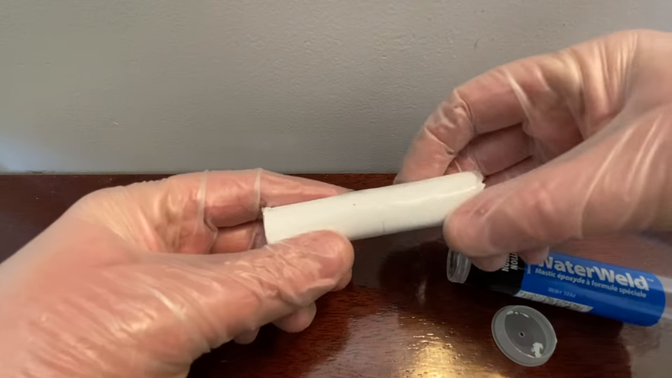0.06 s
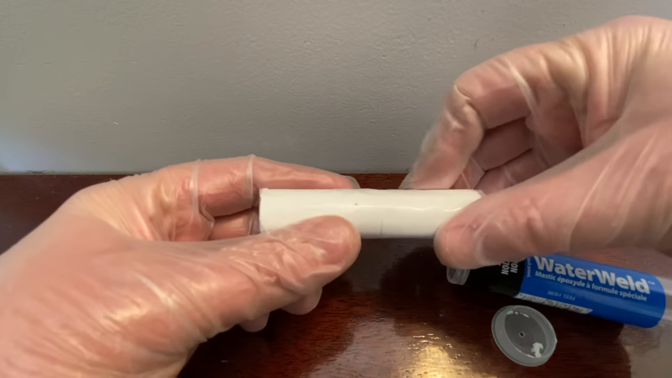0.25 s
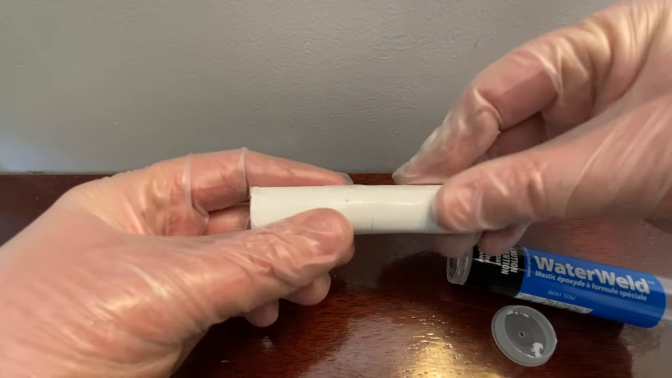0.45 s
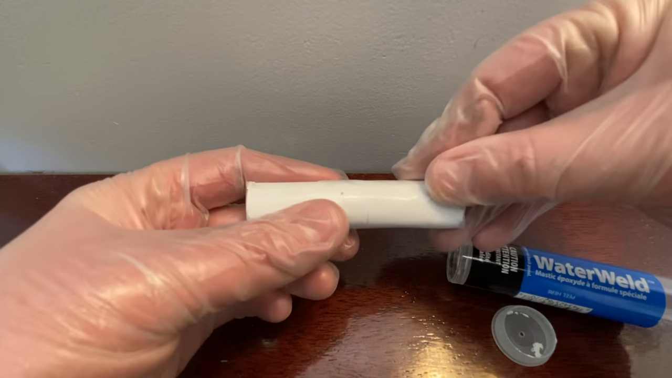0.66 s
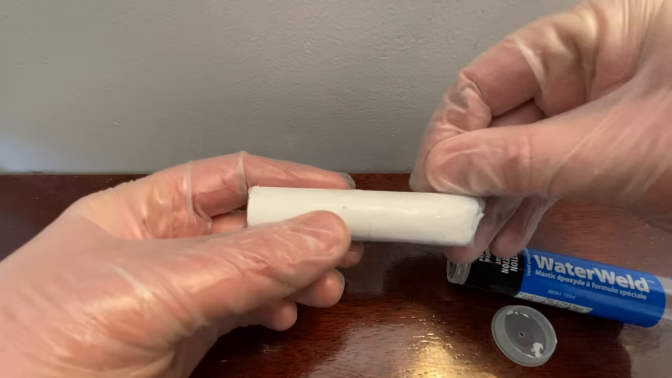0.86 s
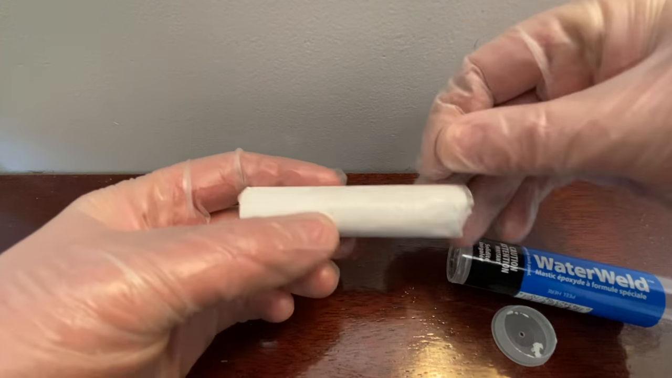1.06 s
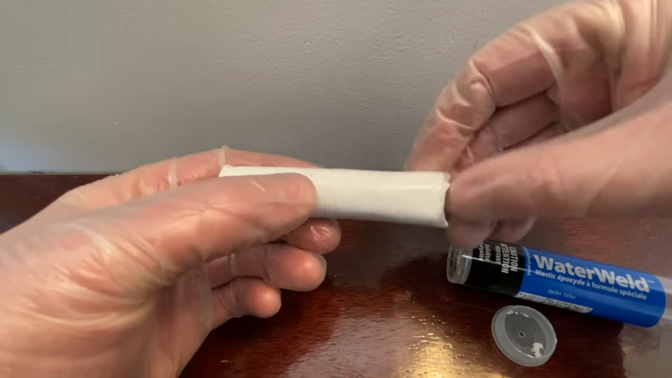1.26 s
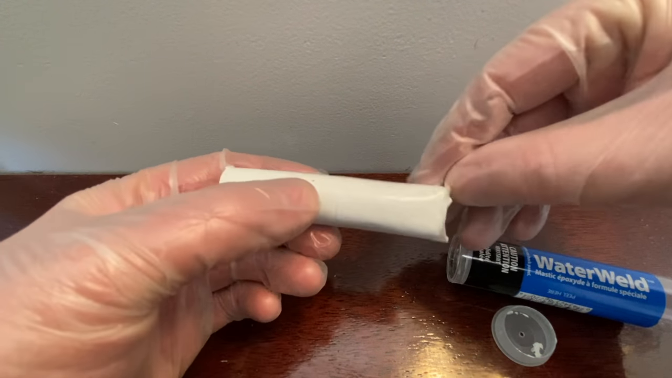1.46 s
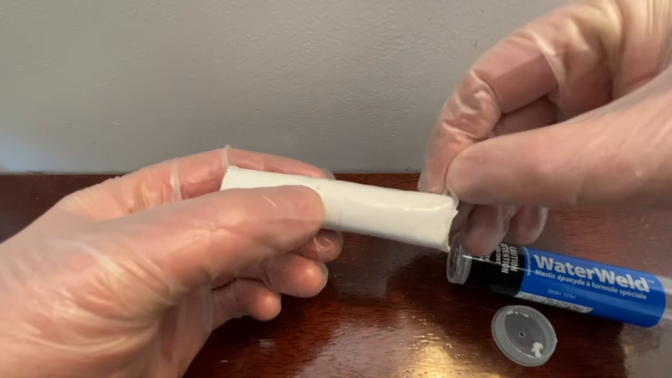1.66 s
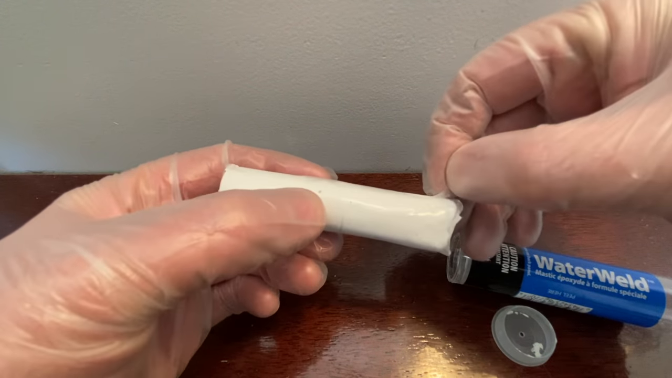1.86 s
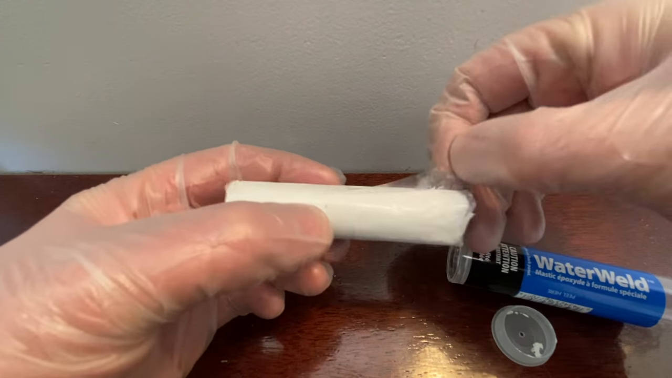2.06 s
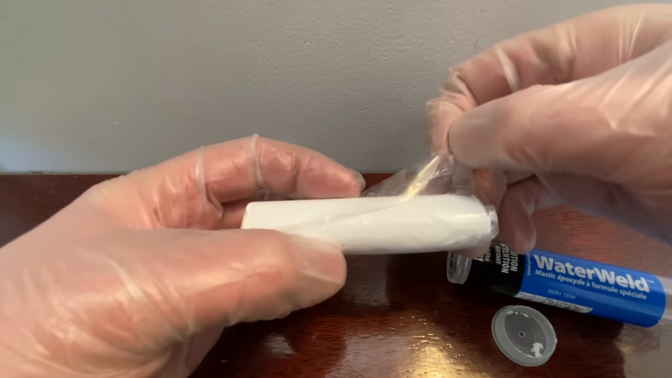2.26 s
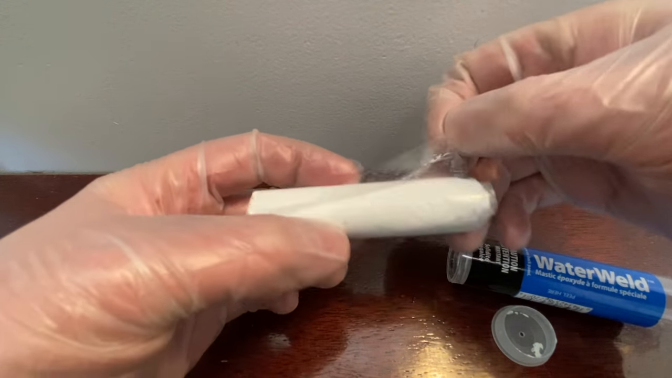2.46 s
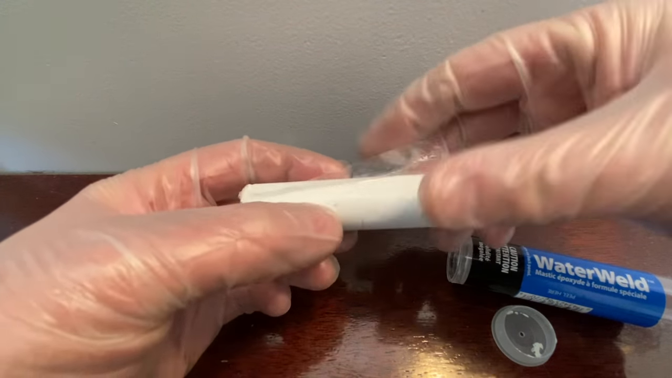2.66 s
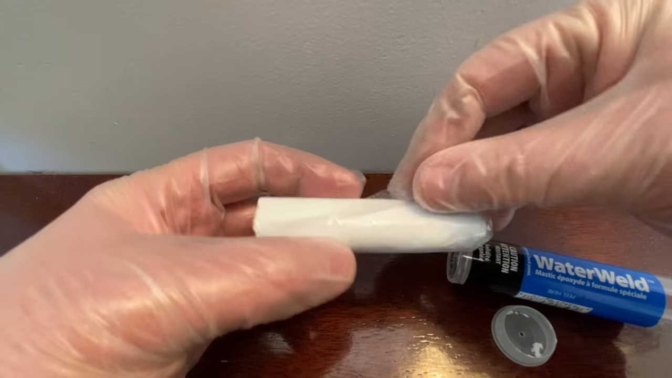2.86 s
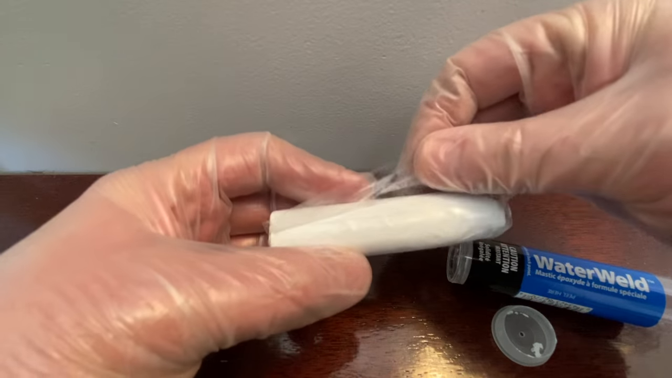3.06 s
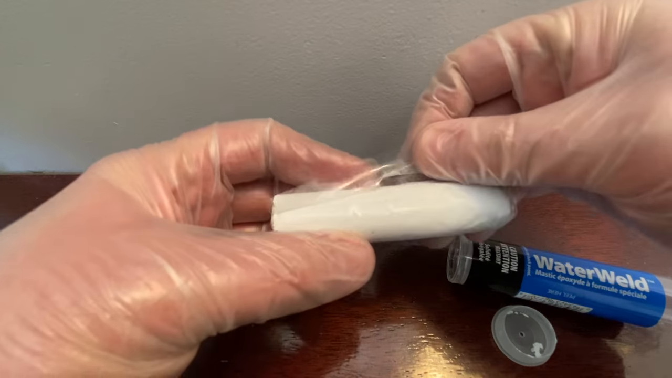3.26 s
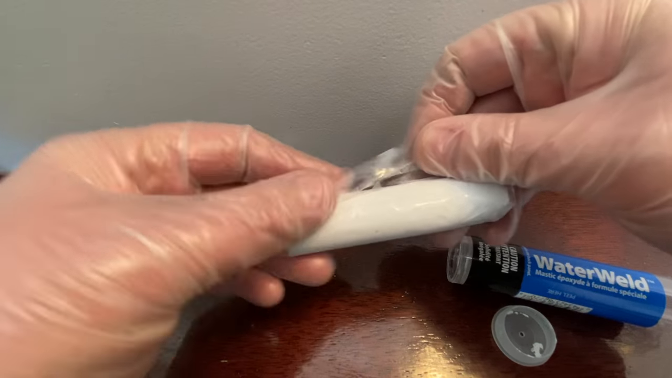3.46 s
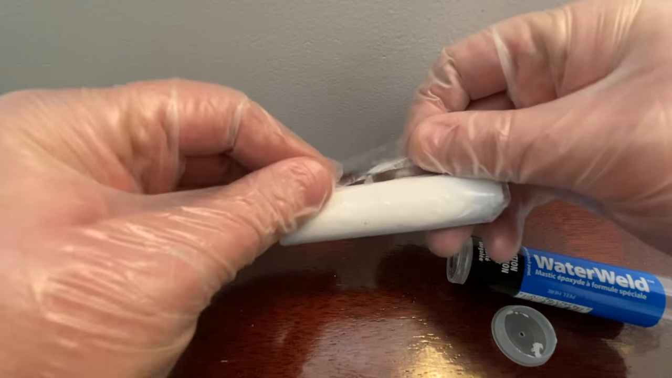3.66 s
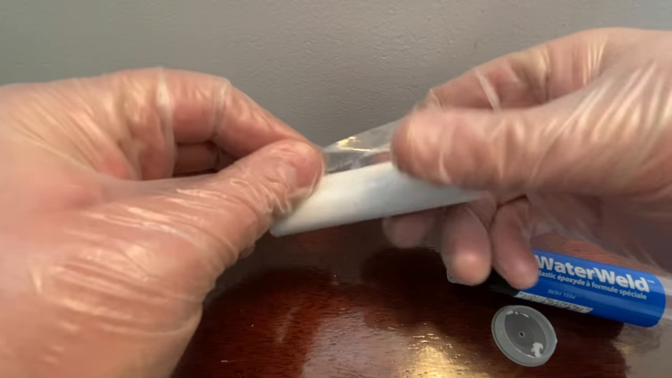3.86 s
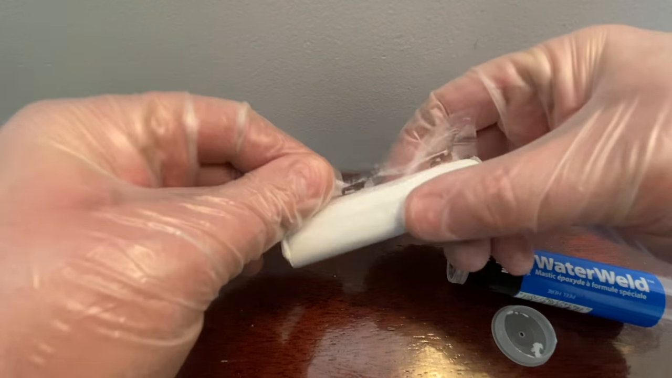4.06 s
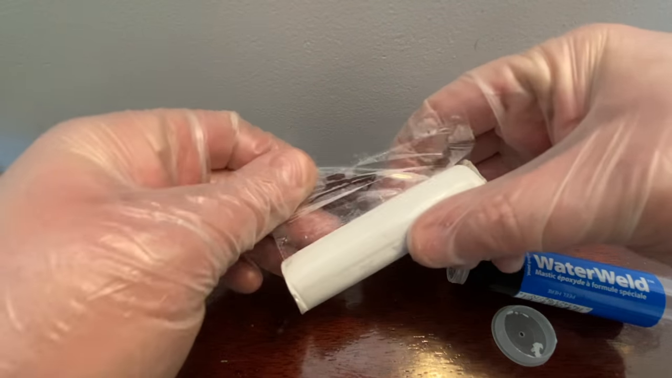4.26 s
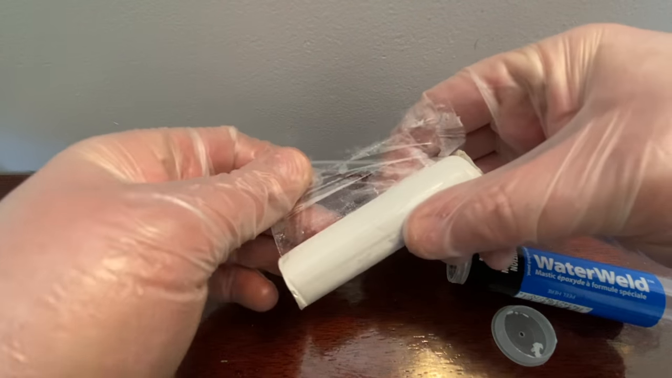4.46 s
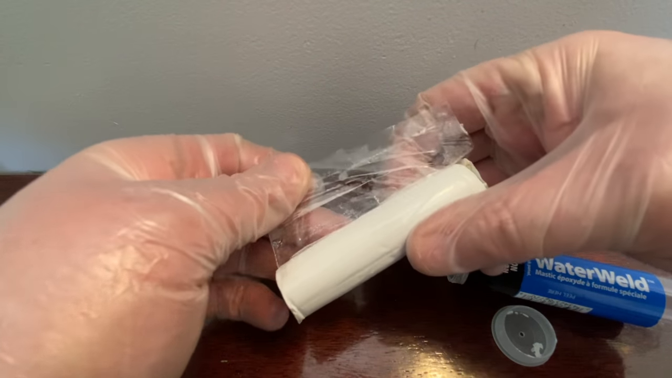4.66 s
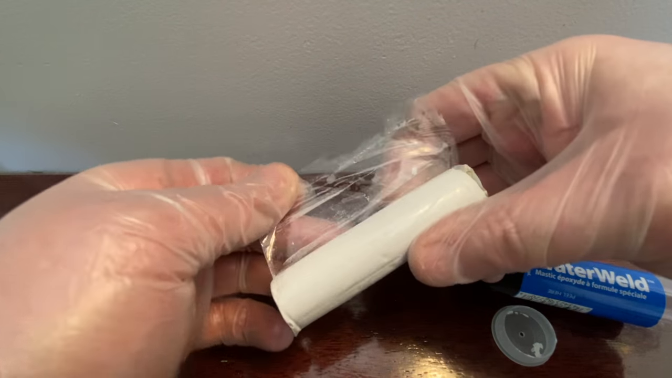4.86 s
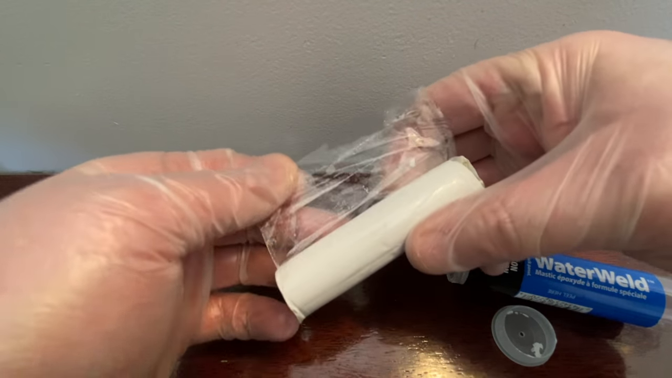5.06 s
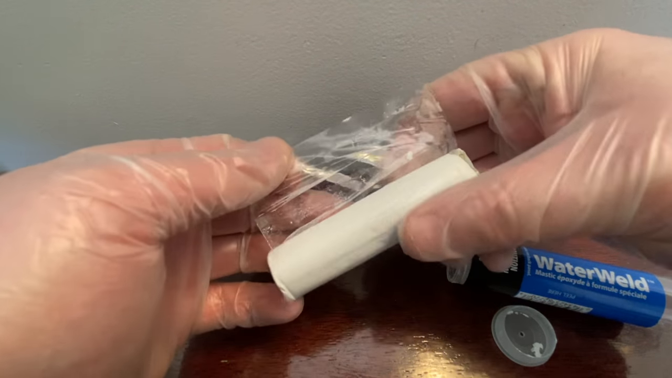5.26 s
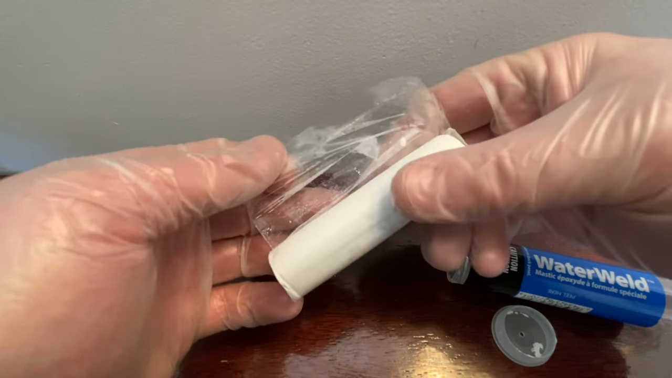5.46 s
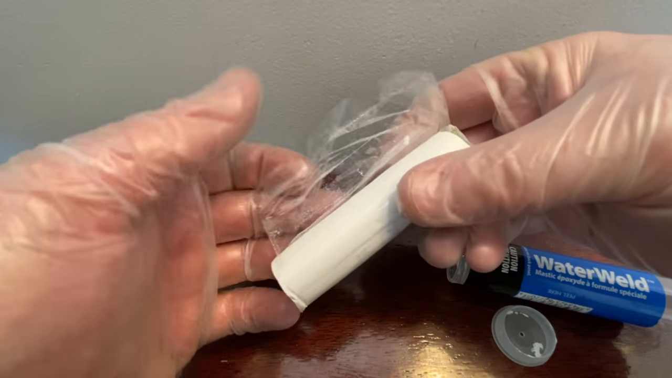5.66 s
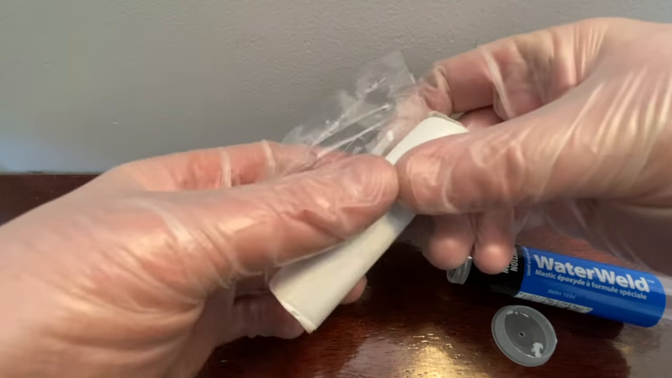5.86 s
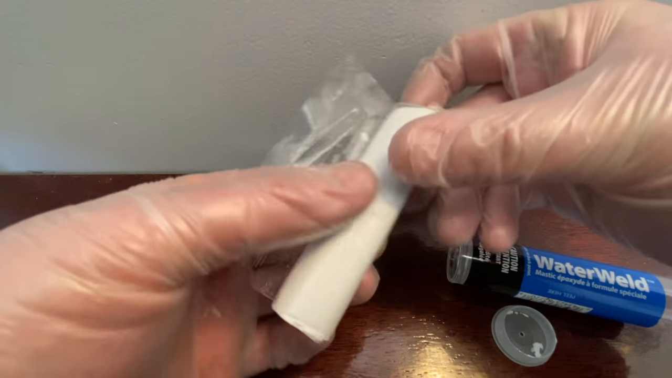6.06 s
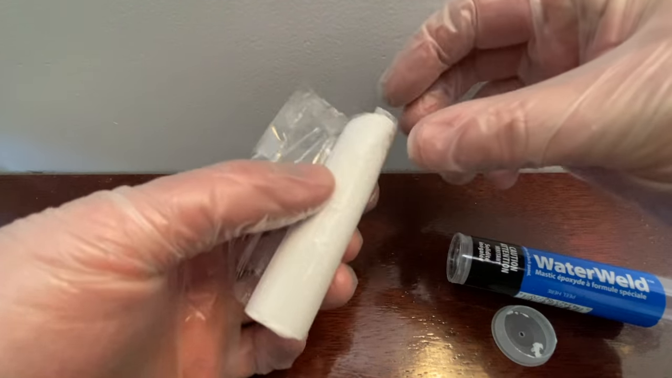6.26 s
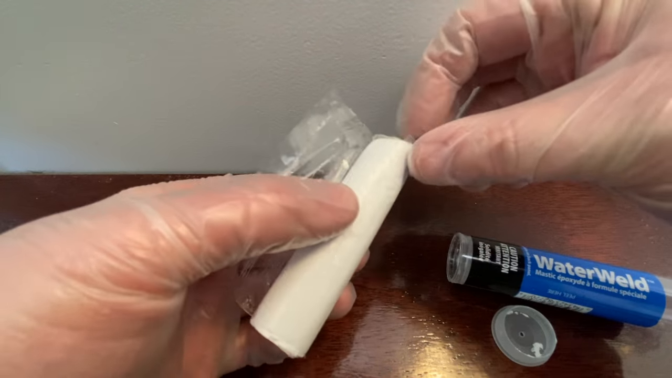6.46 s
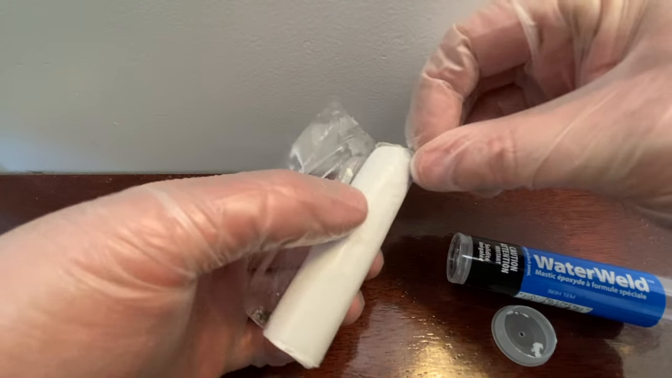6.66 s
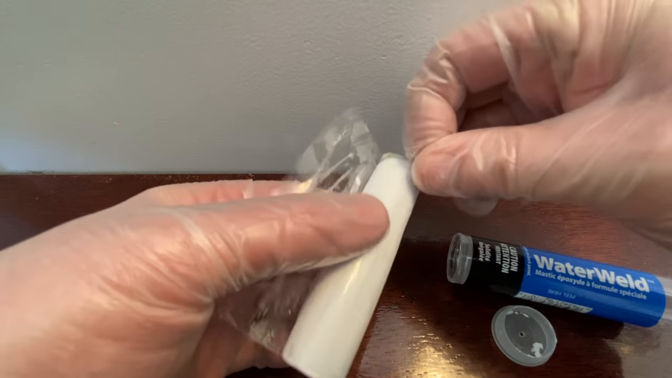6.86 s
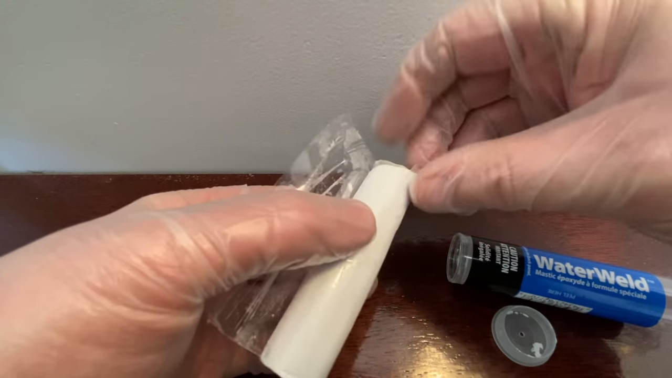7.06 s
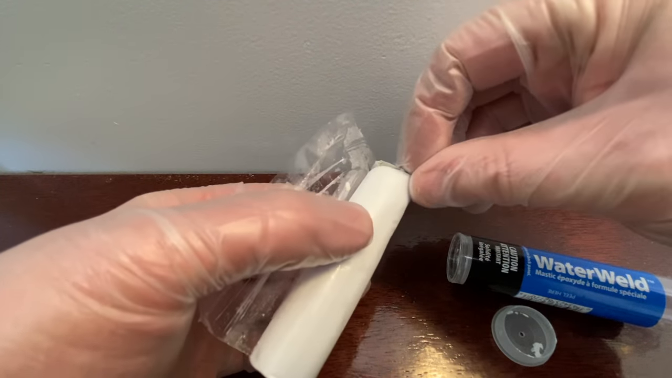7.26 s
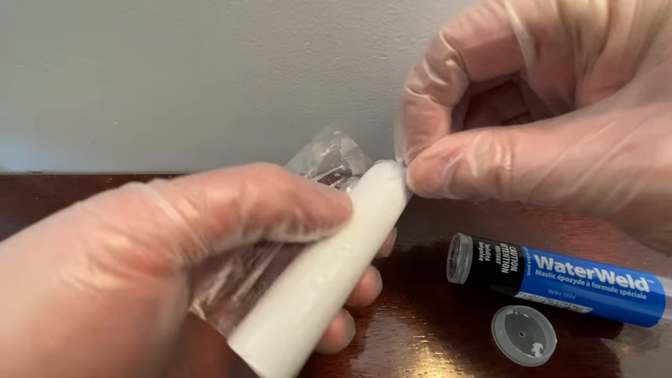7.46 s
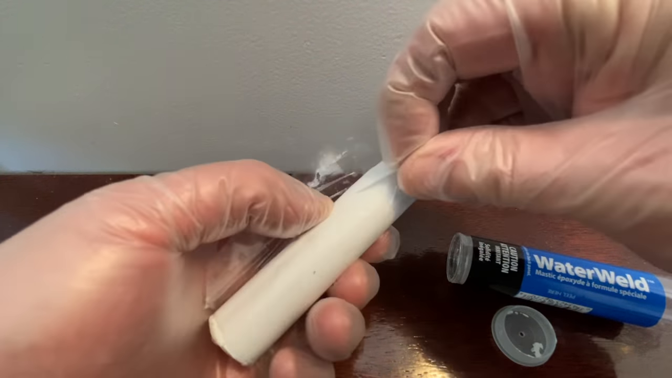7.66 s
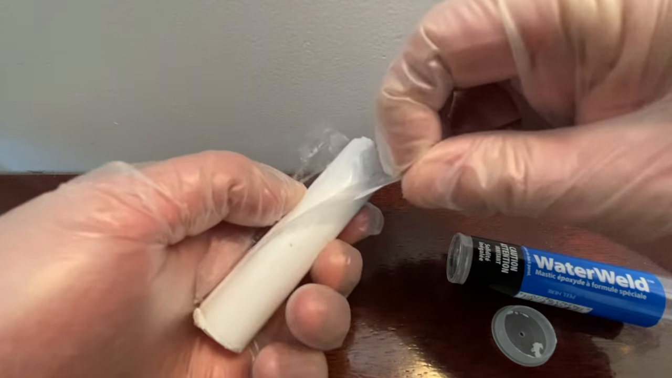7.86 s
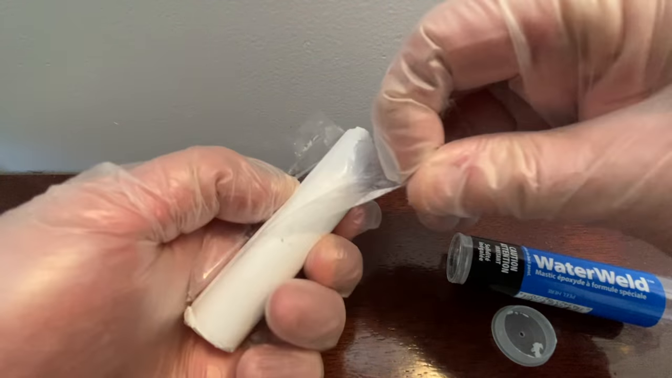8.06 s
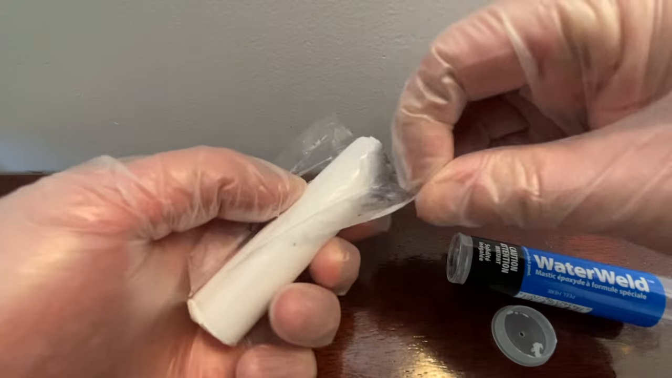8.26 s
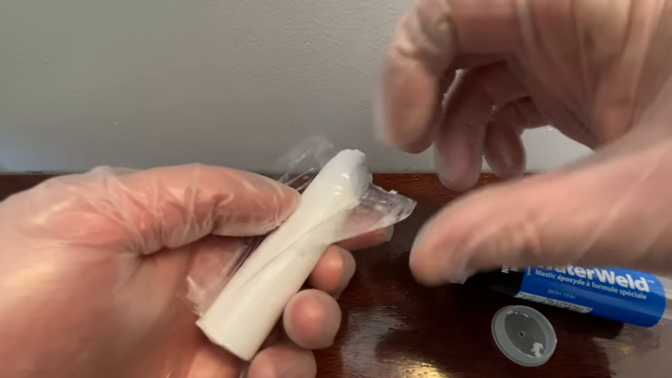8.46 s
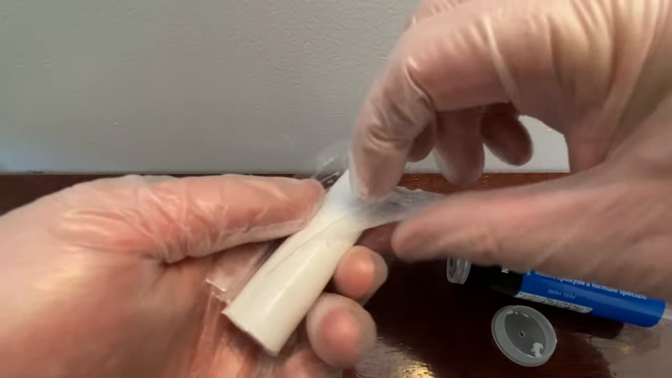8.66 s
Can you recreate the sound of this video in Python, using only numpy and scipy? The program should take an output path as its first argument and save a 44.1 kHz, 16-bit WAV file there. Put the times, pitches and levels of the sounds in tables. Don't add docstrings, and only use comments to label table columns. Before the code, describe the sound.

Thin plastic film crinkles, snaps and tears in sharp bursts as gloved fingers peel it off a putty stick, over low ventilation rumble.

```python
import sys
import numpy as np
from scipy import signal
from scipy.fft import rfft, irfft
from scipy.io import wavfile
from scipy.ndimage import uniform_filter1d

SR = 44100
rng = np.random.default_rng(int(sys.argv[2]) if len(sys.argv) > 2 else 0)


def store_wav(level_fs):
    pcm = np.round(np.clip(np.atleast_2d(level_fs), -1, 1) * 32767)
    wavfile.write(sys.argv[1], SR, pcm.T.astype(np.int16))


def attenuation_scalar(level_db):
    decades = np.asarray(level_db, float) / 20
    return 10 ** decades


N = 384552

# pitch_hz, level_db (per hertz)
AIR_SPECTRUM = [(15, -60.5), (25, -27.5), (81, 2), (100, -7), (145, -14.5), (242, -13.5), (329, -26.5),
                (396, -24.5), (421, -33), (659, -45), (1000, -52.5), (1300, -80.5)]
# pitch_hz, likeness (0 to 1)
AIR_LIKENESS = [(60, 0.77), (130, 0.97), (290, 0.5), (640, 0.07), (15000, 0.29)]
# time_s, pitch_hz, level_db
MOTOR_HUM = [
    (0, 238.7, -50.5),
    (2.2, 233.9, -56.5),
    (3.05, 235.6, -54.5),
    (3.3, 237.3, -69.5),
    (8.72, 245, -71),
]

# start_s, level_db, brightness_db, film_tilt_db_per_octave
BRUSHES = [(0.0, -52.5, -4, 2.5), (0.434, -52, 2.5, 6.0), (0.85, -60.5, -0.5, 1.0), (1.143, -51.5, 5, -1.5),
           (1.298, -56.5, 4, 6), (1.487, -53.5, 3, 6.5), (1.64, -64.5, -2.5, 12), (1.75, -61, 1, 12),
           (2.3, -62.5, 7, 7), (2.524, -53, -7, 6.0), (2.859, -52, -6.5, 12), (3.332, -57, 9, 6.5),
           (3.663, -54, 6.5, 6), (5.098, -51, -8.5, -2.0), (5.289, -59.5, 5, 3.5), (5.54, -65.5, 3, 6.0),
           (5.631, -68, 4, 0.5), (6.471, -64, 2.5, 4.5), (6.87, -58, -8.5, 0.5), (7.0, -53, 0, 6.5),
           (7.24, -67.5, -4, 6.5), (7.35, -66.5, -3, 3.5), (7.46, -61.5, -9, 3.0),
           (8.329, -45.5, -3.5, 3.5), (8.41, -60, -8, -1.5), (8.5, -63, -7.5, -4.5)]
# start_s, length_s, level_db, brightness_db,
# film_tilt_db_per_octave
DRAGS = [(0.09, 0.13, -60, -6.5, 0), (0.207, 0.16, -59, -7.5, 1), (0.498, 0.071, -61.5, -2, 0),
         (0.741, 0.051, -58, 6, 6), (0.947, 0.083, -60.5, -1, 4.0), (1.163, 0.03, -59, 2, -5),
         (1.536, 0.079, -65, -6, 2.0), (1.84, 0.043, -74, -1, 5.0), (2.028, 0.2, -55, -6, 3),
         (2.704, 0.12, -48, -2.5, 4.5), (3.404, 0.17, -55, -5, 6.5), (3.745, 0.14, -52, -3, 4),
         (4.471, 0.091, -63, -3.5, -4.5), (5.32, 0.066, -57.5, -3, 0), (5.775, 0.068, -48.5, -4.5, 3.5),
         (5.966, 0.25, -55.5, -1.5, 1.5), (6.598, 0.094, -62.5, -6.5, -4.5), (6.759, 0.064, -48.5, 0, 3),
         (7.086, 0.056, -64, 2.5, 1.5), (7.157, 0.033, -59.5, -3, 9.0), (7.622, 0.01, -52, -4, -2),
         (7.669, 0.12, -45.5, -4.5, -0.5), (8.178, 0.23, -59, -8.5, 1), (8.592, 0.079, -58.5, -0.5, -1.0),
         (1.1, 0.087, -61, -3, -6), (3.022, .016, -50.5, -6, -2), (4.868, .012, -44, -10, -4),
          (6.25, 0.039, -63, -1, -6), (7.55, .06, -63, -3, -4), (7.97, 0.093, -59, -9, -3),
          (2.57, 0.069, -65, 4.5, 2), (4.3, .08, -60.5, 6, 0.5), (1.44, .04, -67.5, -6, -3),
          (3.58, .05, -63.5, -3, 8)]
PANELS_HZ = [(2100, 2450, 3000, 3640, 4740, 6350), (8940, 11320, 15000), (650, 1000, 1450)]
# film_db, edge_db, pocket_db
RESTING_DB = (-75.5, -70.5, -88)
# film_db, edge_db, pocket_db
SETTLE_DB = (-33.5, -39, -34)
# film_db_per_s, edge_db_per_s, pocket_db_per_s
SETTLE_DB_PER_S = (131, 196, 139)

# start_s, film_db, edge_db, film_hz
SNAPS = [(.0092, -28, -25, 2490), (.452, -33, -16, 4600), (.7738, -20.5, -24, 2400),
         (1.8352, -34, -24, 3200), (1.9881, -32.5, -24.5, 3420), (2.0574, -28.5, -35, 1670),
         (2.0864, -26.5, -23, 2480), (2.0977, -23, -22, 2450), (2.1993, -9.5, -32, 3880),
         (2.3099, -32.5, -31, 3850), (2.8648, -27, -17.5, 5170), (3.053, -7.5, -18, 3630),
         (3.7785, -26.5, -23, 2560), (3.9561, -11, -16, 4610), (3.9623, -9.5, -7.5, 6350),
         (4.0441, -9.5, -8, 3600), (4.0498, -15, -4, 3400), (4.0757, -4, -11, 6380), (4.087, -8, -13, 4460),
         (4.1285, -3.5, -16, 4650), (4.1655, -18, -25, 4720), (4.2141, -18, -16.5, 4804),
         (4.787, -15, -12.5, 3334), (5.1055, -31, -26, 3360), (7.0141, -30, -20, 2444),
         (7.4649, -30, -8.5, 5490), (7.7179, -18, -13.5, 2590), (7.962, -14.5, -10, 3200),
         (8.2912, -30, -20.5, 4200), (8.357, -25.5, -21, 4590), (.8527, -44.5, -56, 2280),
         (1.1782, -42, -50, 2450), (2.046, -51, -42, 3760), (2.8793, -35.5, -38, 3660),
         (3.0154, -38.5, -53, 4800), (3.0565, -7.5, -17.5, 2500), (3.6859, -36.5, -39, 6200),
         (4.2506, -11, -17, 3110), (4.263, -15, -12.5, 1925), (4.8824, -6.5, -11, 3504),
         (4.8846, -5.5, -13.5, 2230), (4.8875, -14.5, -14.5, 3595), (6.0901, -45, -58, 2480),
         (6.2723, -49, -61, 3235), (6.8214, -40, -40, 4600), (7.6419, -43, -46, 6590),
         (7.743, -15, -17, 5600), (8.5529, -50.5, -55.5, 2900)]
# start_s, film_db, edge_db
TICKS = [(0.8084, -45, -32), (0.8233, -36.5, -33), (0.958, -32, -25), (1.0059, -43, -41),
         (1.3253, -54, -22.5), (2.004, -32, -28), (2.176, -32.5, -27), (2.1831, -21, -10),
         (2.189, -16, -15), (2.2063, -17, -11), (2.5302, -32.5, -30), (3.238, -33.5, -34),
         (3.342, -38, -47), (3.678, -54.5, -33), (4.078, -36, -31), (4.1248, -5, -12), (4.132, -14, -6.5),
         (4.623, -39.5, -33.5), (5.1552, -35, -46), (5.3924, -50, -32), (5.801, -33, -26),
         (5.821, -38, -44.5), (5.838, -26.5, -28.5), (6.782, -40, -29), (7.017, -31, -23.5),
         (7.7246, -16, -14), (8.238, -40.5, -37), (8.3473, -26, -18.5), (8.592, -44.5, -23.5),
         (8.6187, -37.5, -29.5), (.8156, -54, -41), (.9987, -52, -47), (1.2693, -52, -50),
         (1.3222, -42, -53), (1.8415, -42, -44), (3.232, -51, -44), (3.6649, -56, -44.5),
         (4.134, -11, -7.5), (4.6984, -59, -50), (5.8057, -44.5, -32), (5.8632, -42.5, -39),
         (5.9799, -52.5, -44), (6.061, -50, -40.5), (7.731, -16.5, -9.5), (7.734, -29, -7),
         (7.736, -15, -16), (3.044, -27, -15), (.094, -49, -55), (4.8975, -26, -34), (.222, -49, -60),
         (7.141, -51.5, -50), (7.194, -51.5, -55), (5.25, -60.5, -60)]
# start_s, edge_db
FLICKS = [(.058, -34), (.6079, -48), (.7525, -48), (.799, -35), (1.0342, -40.5), (8.6503, -41),
          (1.6477, -31), (1.7927, -39), (1.8726, -34), (1.8882, -45), (1.9076, -39.5), (1.9787, -32),
          (2.1308, -41), (2.475, -40), (2.722, -26), (2.9719, -44), (3.329, -38), (3.4933, -38),
          (3.681, -29.5), (4.7062, -44), (5.2961, -34), (6.5181, -34), (6.6314, -51.5), (7.0211, -19),
          (7.341, -47), (7.4684, -20), (7.5802, -41.5), (7.702, -35), (8.2658, -31.5), (8.4628, -36.5),
          (0.099, -47), (.128, -51), (.8524, -61), (1.02, -45), (2.024, -30), (3.799, -39.5), (6.33, -63),
          (6.6, -48), (6.691, -51), (6.74, -42), (6.7621, -43), (7.145, -39), (7.3192, -48), (7.643, -45),
          (8.012, -37), (8.074, -49), (8.142, -51), (8.3348, -31), (8.343, -26), (0.241, -44.5),
          (0.266, -47), (.6426, -58), (0.708, -47), (1.848, -35), (2.4551, -47), (2.6192, -49),
          (2.9934, -45.5), (3.009, -50.5), (4.6024, -60), (5.318, -38.5), (5.7037, -52), (5.9329, -47),
          (8.1239, -60), (8.5072, -47), (1.92, -50), (1.9945, -40), (7.29, -57), (.63, -56), (.15, -54),
          (5.385, -38)]
# start_s, film_db, edge_db, pocket_db, pocket_hz
POPS = [(2.021, -23.5, -22.5, -38, 1150), (2.0736, -30.5, -25, -32.5, 690), (2.185, -19, -35, -19.5, 1110),
        (2.1945, -22, -13, -14.5, 1050), (2.2027, -16, -9, -29, 870), (2.4885, -40.5, -60, -37.5, 1020),
        (2.731, -24.5, -24, -35, 1000), (3.04, -10.5, -7, -24, 690), (3.0503, -13.5, -1, -16, 1150),
        (3.753, -46, -52, -40.5, 630), (3.794, -35, -44, -34, 1010), (3.9589, -9.5, -5.5, -16.5, 1160),
        (3.99, -29, -29, -37, 1300), (4.1215, -5.5, -11, -24, 860), (4.2482, -12, -8.5, -15.5, 748),
        (4.716, -21, -23.5, -34.5, 674), (4.787, -38, -38.5, -21.5, 760), (4.8821, -12.5, -4.5, -14, 730),
        (5.636, -35.5, -47, -41, 1067), (5.6655, -28.5, -39, -28.5, 714), (5.7741, -34, -29.5, -35.5, 943),
        (7.6353, -32, -50, -41.5, 532.6), (7.7403, -15.5, -14.5, -18.5, 1330),
        (7.7497, -15, -15, -17, 1060), (2.2098, -25, -16, -17.5, 810), (3.0469, -19.5, -15, -21, 1041),
        (4.2529, -10, -14, -14, 1000), (4.257, -12, -21, -13, 1028), (4.1387, -21, -30, -24.5, 692),
        (5.4006, -48, -42, -38.5, 590)]
# start_s, pocket_db, pocket_hz
DENTS = [
    (2.324, -35.5, 1030),
    (2.455, -52.5, 810),
    (3.58, -53, 676),
    (4.718, -41, 620),
    (5.365, -48.5, 798),
    (5.6685, -50.5, 696),
    (6.11, -51, 754),
    (7.966, -29, 1114),
    (8.352, -33, 880),
]
# start_s, end_s, film_db, edge_db, pocket_hz
TEARS = [
    (2.193, 2.221, -19.5, -24, 950),
    (3.043, 3.05, -15.5, -13, 863),
    (4.12, 4.132, -14, -13.5, 803),
    (4.247, 4.264, -12.5, -9, 905),
    (4.881, 4.885, -7.5, -16.5, 577),
    (7.729, 7.752, -17.5, -15, 1150),
    (7.718, 7.727, -22.5, -13.5, 1900),
    (3.051, 3.061, -14, -18, 700),
    (4.885, 4.889, -11, -19.5, 710),
]
# start_s, level_db, pitch_hz
THUMPS = [
    (4.252, -11, 410),
    (5.276, -31, 260),
    (5.4, -27, 299.5),
    (7.724, -26, 234.4),
    (5.6353, -28, 400),
    (5.664, -25.5, 397),
    (5.7743, -31, 299),
]
# start_s, level_db, pitch_hz, fade_by_60_db_s
DRUMS = [(4.887, -8, 581, .03), (4.884, -16, 780, 0.053), (4.888, -15, 410, .025),
         (4.256, -15.5, 1010, 0.043), (4.134, -20, 630, 0.021), (2.2, -20, 799, 0.056),
         (2.196, -23.5, 1027, .05), (7.75, -20, 1080, 0.068), (7.742, -20, 1310, 0.059),
         (7.751, -22, 734, 0.031), (3.052, -16, 610, 0.02), (4.788, -30, 716, .06), (7.964, -36, 1100, .12),
         (4.258, -28, 950, .2), (2.22, -34, 800, .2), (7.755, -30, 900, .12)]

# pitch_hz, fade_by_60_db_s
ROOM_RING = [(400, 0.42), (1060, 0.36), (2800, 0.16), (7400, 0.11), (15000, 0.12)]
# pitch_hz, width_hz, level_db
TONE_COLOUR = [(2070, 130, -6.5), (3420, 270, 1.5), (9140, 1400, 3.5), (15600, 1000, 0.5), (1600, 500, 3.5),
               (6800, 1800, 2.5)]
# pitch_hz, left_minus_right_db
SHADE = [(200, 2), (400, 7), (700, 9), (1300, 2.5), (2400, 1), (4400, 5.5), (7000, 1)]


def at_hz(points, hz):
    table_hz, values = np.array(points)[:, :2].T
    return np.interp(np.log(hz + 1), np.log(table_hz), values)


def drift(rate):
    points = rng.standard_normal(500)
    return np.interp(np.arange(N) / SR * rate, np.arange(500), points)


def rms_one(x):
    return x / np.sqrt(np.mean(x ** 2) + 1e-20)


def resonance(f, hz, q):
    return 1 / (1 + 1j * q * (f / hz - hz / (f + 1e-9)))


def ears(f, film, edge, pocket, turn):
    body = film * attenuation_scalar(3.0) + pocket * attenuation_scalar(2.4)
    shade = attenuation_scalar(at_hz(SHADE, f) / 2)
    left = body * shade + edge
    right = body / shade * np.exp(-1j * turn) + edge
    return np.stack([left, right])


def crackle(shape, spread_db):
    return rng.standard_normal(shape) * attenuation_scalar(spread_db * np.minimum(rng.exponential(1, shape), 5))


def ventilation():
    f = np.arange(N // 2 + 1) * SR / N
    mid, side = rfft(rng.standard_normal((2, N))) * attenuation_scalar(at_hz(AIR_SPECTRUM, f)) * (f < 1700)
    alike = np.clip(at_hz(AIR_LIKENESS, f), 0, 1)
    air = irfft(np.sqrt(1 + alike) * mid + np.sqrt(1 - alike) * side * [[1], [-1]], N)

    times, *columns = np.transpose(MOTOR_HUM)
    hum_hz, hum_db = [np.interp(np.arange(N) / SR, times, c) for c in columns]
    hum_gain = np.sqrt(2) * attenuation_scalar(hum_db + 2.3 * drift(14.0))
    hum = hum_gain * np.sin(2 * np.pi * np.cumsum(hum_hz + 1.5 * drift(5.7)) / SR)

    boom_gain = attenuation_scalar(-49.0 + 1.0 * drift(23))
    boom = boom_gain * np.sin(2 * np.pi * np.cumsum(78.5 + 2.0 * drift(16)) / SR)
    return attenuation_scalar(-47) * rms_one(air) * attenuation_scalar([[.8], [-.8]]) + hum + boom * attenuation_scalar([[1.1], [-1.1]])


def rubbing(crease):
    brush_s, rise_db_per_s, fade_db_per_s = 0.036, 700, 300
    brushes = [(s, brush_s, *rest) for s, *rest in BRUSHES]
    start, length, db, bright, tilt = np.array(DRAGS + brushes).T[:, :, None]
    t = np.arange(0, N + 128, 128) / SR
    rise = rise_db_per_s * np.maximum(start - t, 0)
    fade = fade_db_per_s * np.maximum(t - start - length, 0)
    shape = db - rise - fade
    after = t - crease[0][:, None]
    levels = []
    for k, voice_db in enumerate((0, 3.5 + bright, -15 - bright)):
        settle = crease[k + 1][:, None] + SETTLE_DB[k] - SETTLE_DB_PER_S[k] * np.abs(after)
        still = (attenuation_scalar(settle) ** 2 * (after > 0)).sum(axis=0) + attenuation_scalar(RESTING_DB[k]) ** 2
        group = []
        for hz in PANELS_HZ[k]:
            lean = (tilt - 1.5) * np.log2(hz / 3700) * (k == 0)
            power = still + (attenuation_scalar(shape + voice_db + lean) ** 2).sum(axis=0)
            group.append(np.interp(np.arange(N) / SR, t, 10 * np.log10(power)))
        levels.append(group)
    return levels


def rustle(levels_db):
    f = np.arange(N // 2 + 1) * SR / N
    strays = 17 * rng.standard_normal(N) * (rng.random(N) < 330 / SR)
    parts = []
    for group, group_db in zip(PANELS_HZ, levels_db):
        grain = rfft(crackle(N, spread_db=4.8) * attenuation_scalar(3.5 * drift(55)) + strays)
        rings = []
        for hz, db in zip(group, group_db):
            swell = attenuation_scalar(db + 3 * drift(14))
            rings.append(swell * rms_one(irfft(grain * resonance(f, hz, 3.2) ** 2, N)))
        mixed = (sum(rings[::2]) - sum(rings[1::2])) / np.sqrt(len(group))
        parts.append(rfft(attenuation_scalar(-5.0) * mixed))
    turn = 1.59 * np.minimum(f / 600, 1) + 0.073 * np.sin(f / 500)
    return irfft(ears(f, *parts, turn), N)


def creases():
    snap, pop, dent, tick, flick = map(np.transpose, (SNAPS, POPS, DENTS, TICKS, FLICKS))
    taut = [*snap[:3], snap[1] - 25.5]
    small = np.hstack([tick, [flick[0], flick[1] - 13.5, flick[1]]])
    dented = [dent[0], dent[1] - 7.5, dent[1] - 15, dent[1], dent[2]]
    hollow = np.hstack([pop, dented])
    levels = np.hstack([taut, hollow[:4], [*small, small[1] - 19.5]])

    slack = rng.random((levels.shape[1], 2))
    film_hz = 2200 * 2.4 ** slack[:, 0]
    pocket_hz = 750 * 2.1 ** slack[:, 1]
    film_hz[:len(SNAPS)] = snap[3]
    pocket_hz[len(SNAPS):len(SNAPS) + hollow.shape[1]] = hollow[4]
    return np.vstack([levels, film_hz, pocket_hz])


def voices(f, film_hz, edge_hz, pocket_hz):
    film = resonance(f, film_hz, 5.5) + .5 * resonance(f, 3600, 0.44) ** 2
    edge = resonance(f, edge_hz, 0.93) ** 2
    pocket = resonance(f, pocket_hz, 3.8) * resonance(f, pocket_hz, 0.77)
    return film, edge, pocket


def struck(bursts, film_db, edge_db, pocket_db, film_hz, pocket_hz):
    size = bursts.shape[1]
    f = np.arange(size // 2 + 1) * SR / size
    spectra = rfft(bursts)
    edge_hz = 10880 + 520 * np.clip(edge_db - film_db - 13, 0, 8)
    responses = voices(f, film_hz[:, None], edge_hz[:, None], pocket_hz[:, None])
    parts = []
    for response, db in zip(responses, (film_db, edge_db, pocket_db)):
        ringing = spectra * response
        top = uniform_filter1d(irfft(ringing) ** 2, size=48).max(axis=1)
        parts.append(ringing * (attenuation_scalar(db) / np.sqrt(2 * top))[:, None])
    place = rng.standard_normal((len(bursts), 2))
    turn = (1.35 + .3 * place[:, :1]) * np.minimum(f / 1100, 1)
    turn = turn + .5 * place[:, 1:] * np.minimum(f / 4000, 1)
    return irfft(ears(f, *parts, turn))


def add(out, starts, pieces):
    for k, s in enumerate(starts):
        i = int(s * SR)
        out[:, i:i + pieces.shape[2]] += pieces[:, k, :N - i]


def snaps(crease):
    s, *controls = crease
    lead_s = .003
    t = np.arange(2048) / SR - lead_s
    giving_way = np.exp(t / .0005) * .9 + .1 * np.exp(t / .0015)
    settling = np.exp(-t / .0008) * .9 + .1 * np.exp(-t / .004)
    flip = np.where(t < 0, giving_way, settling)
    out = np.zeros((2, N))
    add(out, s + .0004 - lead_s, struck(rng.standard_normal((len(s), len(t))) * flip, *controls))
    return out


def tears():
    start, end, film_db, edge_db, pocket_hz = np.transpose(TEARS)
    t = np.arange(4096) / SR
    past_end = np.maximum(t - (end - start)[:, None], 0)
    pull = np.clip(t / .002, 0, 1) * np.exp(-past_end / .0025)
    clumps = attenuation_scalar(25.0 * uniform_filter1d(rng.standard_normal(pull.shape), size=60))
    bursts = crackle(pull.shape, spread_db=-2.0) * clumps * pull
    film_hz = np.full(len(start), 2450.0)
    out = np.zeros((2, N))
    add(out, start, struck(bursts, film_db, edge_db, film_db - 6, film_hz, pocket_hz))
    return out


def thumps():
    out, t = np.zeros(N), np.arange(N) / SR
    knock_band = signal.butter(2, [350, 2200], "band", fs=SR, output="sos")
    knock = signal.sosfilt(knock_band, rng.standard_normal(N))
    for s, db, hz, t60 in DRUMS:
        after = np.maximum(t - s, 0)
        fade = attenuation_scalar(db - 60 * after / t60)
        out += fade * np.sin(2 * np.pi * hz * after) * (1 - np.exp(-after / 0.0013))
    for s, db, hz in THUMPS:
        after = np.maximum(t - s, 0)
        ring = np.sin(2 * np.pi * hz * after) * np.exp(-after / 0.0016)
        ring = ring + 0.5 * knock * np.exp(-after / 0.0087)
        out += attenuation_scalar(db) * ring * (1 - np.exp(-after / .001))
    return out * attenuation_scalar([[3.6], [-3.6]])


def room(x):
    room_db, table_db = -16, -11.5
    t, tail = np.arange(SR // 2) / SR, 0
    edges = 300 * 2 ** np.arange(0, 6.1, .75)
    for low, high in zip(edges, edges[1:]):
        band_filter = signal.butter(2, [low, high], "band", fs=SR, output="sos")
        band = signal.sosfilt(band_filter, rng.standard_normal((2, len(t))))
        tail = tail + band * attenuation_scalar(-60 * t / at_hz(ROOM_RING, np.sqrt(low * high)))
    tail_size = np.sqrt((tail ** 2).sum(axis=1, keepdims=True))
    tail = attenuation_scalar(room_db) * tail * np.clip(t / 0.0024, 0, 1) / tail_size
    dull = signal.lfilter([.45], [1, -.55], rng.standard_normal((2, len(t))))
    early = dull * np.exp(-t / 0.01) * (t > .002)
    early = attenuation_scalar(table_db) * early / np.sqrt((early ** 2).sum(axis=1, keepdims=True))
    return signal.fftconvolve(.7 * x + .3 * x[::-1], tail + early, axes=1)[:, :N]


def scene():
    crease = creases()
    film = rustle(rubbing(crease)) + snaps(crease) + tears() + thumps()
    f = np.arange(N // 2 + 1) * SR / N
    colour = 1
    for hz, width, db in TONE_COLOUR:
        colour = colour * (1 + (attenuation_scalar(db) - 1) * resonance(f, hz, hz / width))
    heard = irfft(rfft(film + room(film)) * colour, N)
    hiss = attenuation_scalar(-76.5) * rng.standard_normal((2, N))
    return heard + ventilation() + hiss


def band_limit(x):
    return signal.sosfilt(signal.butter(12, 16680, fs=SR, output="sos"), x)


def record(dry):
    port_lag_s, in_step_hz, cutoff_hz = .000245, 11250, 16600
    f = np.arange(N // 2 + 1) * SR / N
    sides = rfft(dry)
    shared = np.clip((f - 6000) / 4800, 0, .9)
    late = np.stack([np.exp(-2j * np.pi * (f - in_step_hz) * port_lag_s), np.ones_like(f)])
    heard = irfft((1 - shared) * sides + shared * sides.mean(axis=0) * late, N)
    top_cut = signal.cheby2(12, 70, cutoff_hz, fs=SR, output="sos")
    mix = np.clip(signal.sosfilt(top_cut, np.clip(heard, -1, 1)), -1, 1)
    return band_limit(mix)


dry = scene()
out = record(dry)
store_wav(out)
```